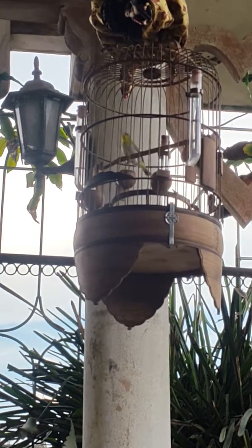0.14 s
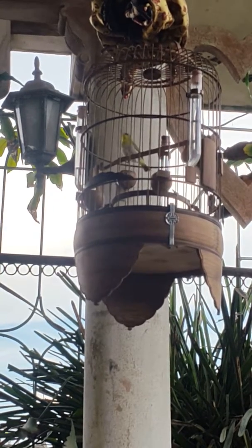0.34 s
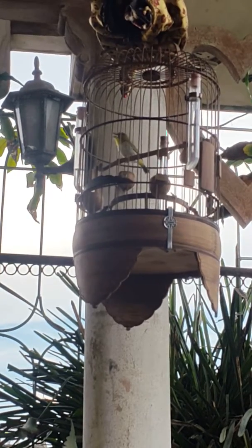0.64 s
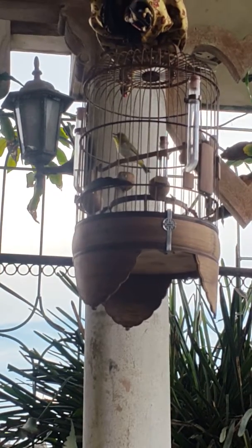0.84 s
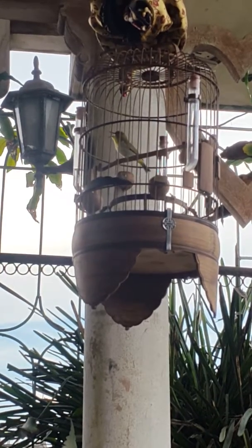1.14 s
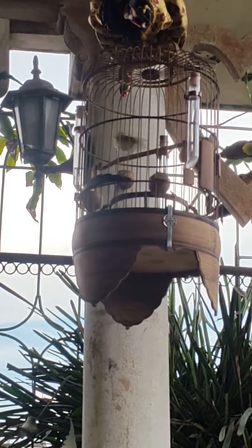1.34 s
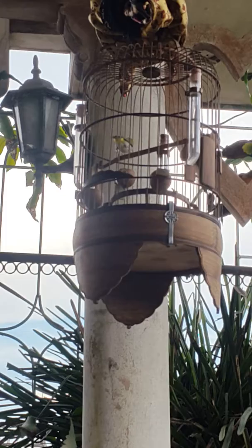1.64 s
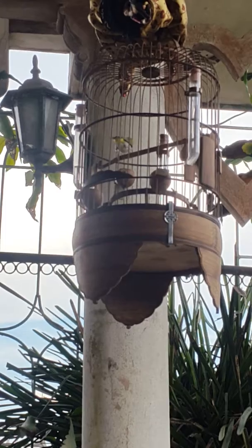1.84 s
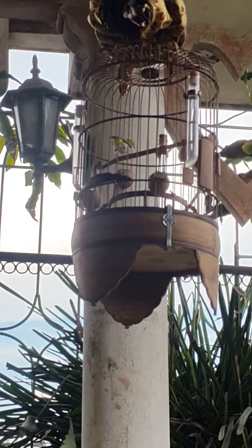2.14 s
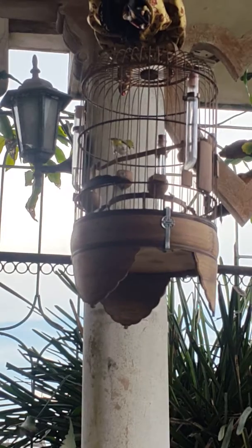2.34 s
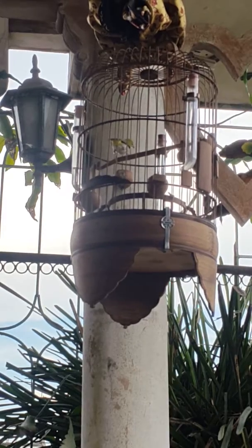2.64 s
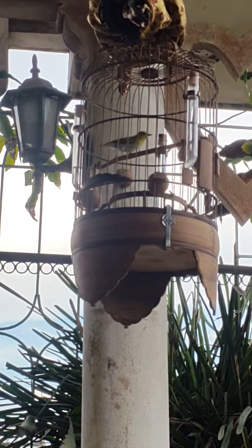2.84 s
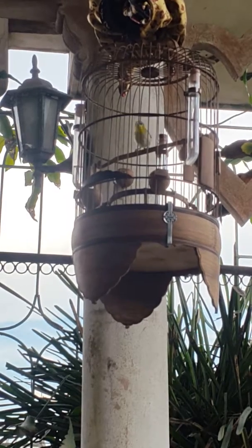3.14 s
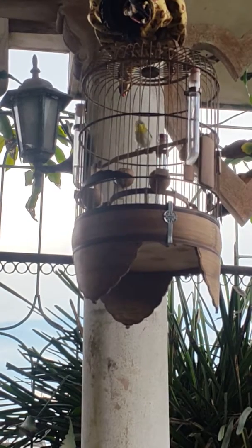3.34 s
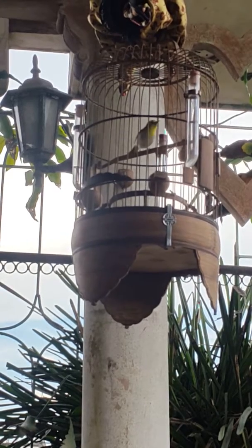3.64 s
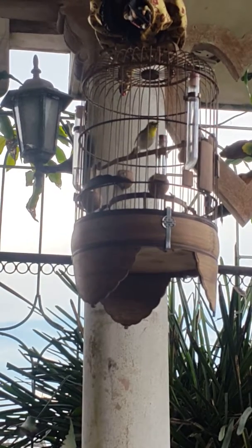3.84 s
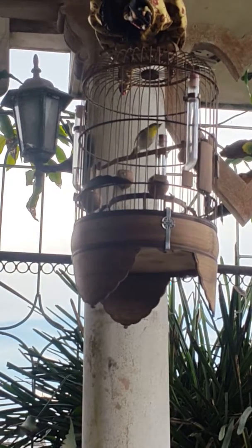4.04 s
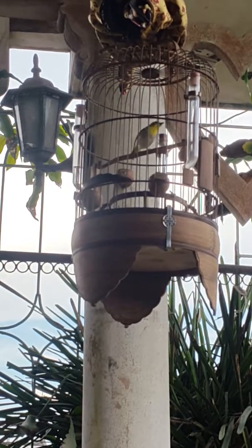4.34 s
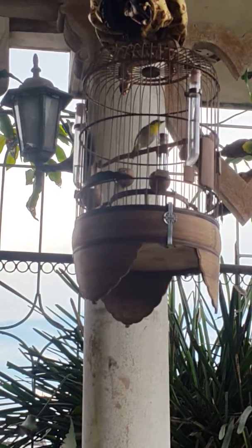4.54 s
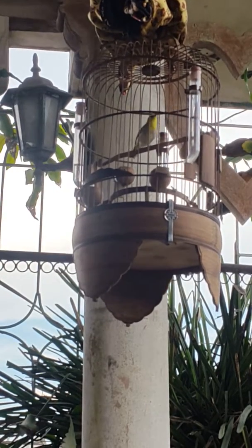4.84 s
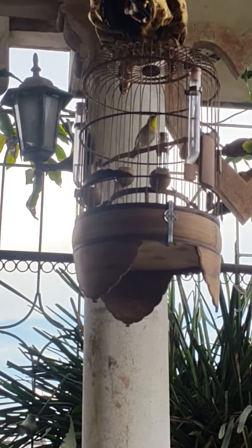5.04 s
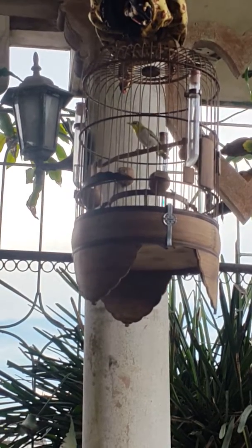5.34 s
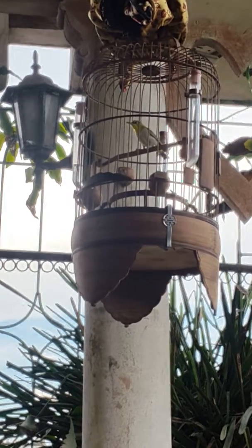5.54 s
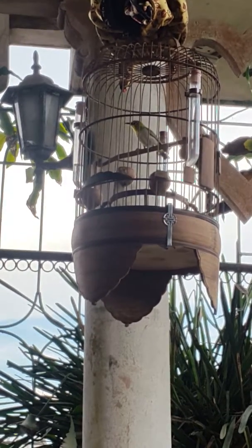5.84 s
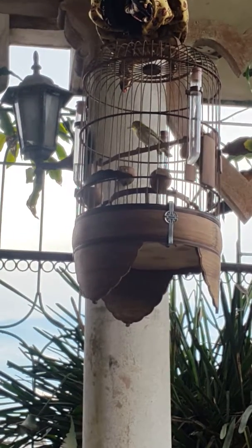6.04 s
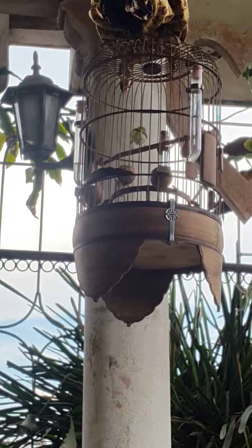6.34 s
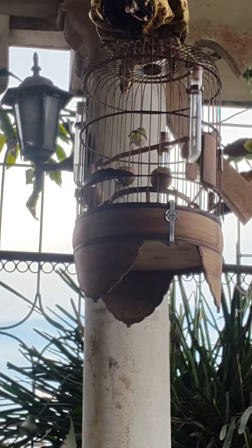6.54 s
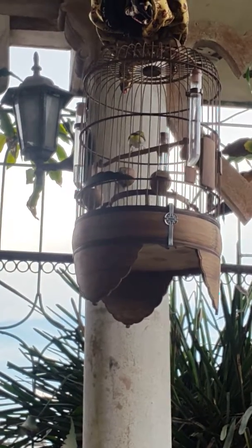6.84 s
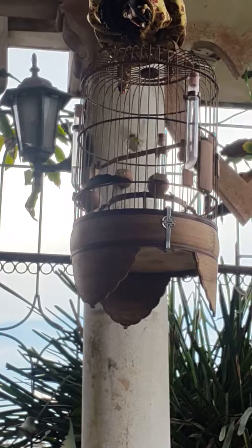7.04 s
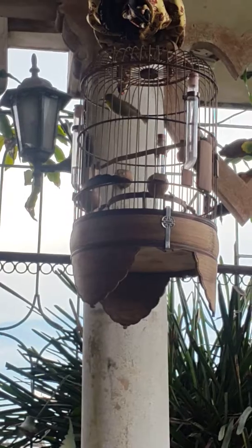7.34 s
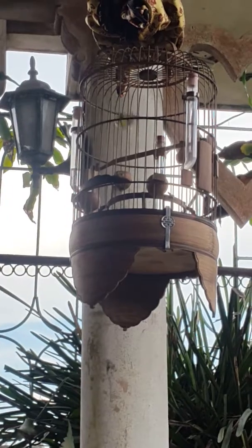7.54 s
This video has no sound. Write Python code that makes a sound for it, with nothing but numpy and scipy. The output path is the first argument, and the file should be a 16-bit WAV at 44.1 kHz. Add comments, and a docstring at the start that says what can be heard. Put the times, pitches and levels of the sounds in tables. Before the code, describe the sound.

A small caged songbird whistles three fast, bright, down-sliding twitter phrases on a roofed balcony, with faint town rumble and very distant calls behind.

```python
"""A town rumbles and hisses, far birds call, then a caged white-eye twitters three fast phrases on a roofed balcony.
Each of its notes is one nearly pure whistle that flicks up and slides down; echoes smear it into a bright tail.
Far calls are gliding sines and far metal is knocked modes, both heard through a diffuse tail.
The town is shaped noise plus an engine hum; a faint high whine is one wavering sine."""
import sys
import numpy as np
from scipy import signal
from scipy.fft import rfft, irfft
from scipy.io import wavfile

SR = 44100
rng = np.random.default_rng(int(sys.argv[2]) if len(sys.argv) > 2 else 0)


def wav_out(sig):
    """Save sig, one row per channel (or a flat mono array), as 16-bit PCM at SR to the path in sys.argv[1]."""
    wavfile.write(sys.argv[1], SR, np.round(np.clip(np.atleast_2d(sig).T, -1, 1) * 32767).astype(np.int16))


N = 339562
TIME = np.arange(N) / SR

# microphone colour towards the cage: f/Hz, left level/dB, right level/dB
MIC_COLOUR = [(3000, -1, 2.5), (4840, -8, 3.5), (5680, -3.5, 6.5), (6480, -6.5, 3.5), (7600, -2, 7.5),
              (9040, 7.5, -5), (10400, -0.5, -15.5), (11040, -7.5, -14), (13200, -0.5, -10.5),
              (14200, 1.5, 0), (15400, -1, 1)]


def white_eye():
    """The bird turns its head as it sings, so each note meets the walls differently."""
    out = np.zeros((2, N + 2 * SR))
    for note, direct_db, overtones_db in song():
        at = round(note[:, 0].min() * SR)
        path = balcony(direct_db)
        for sound in (whistle(in_register(note), overtones_db), flick_puff()):
            heard = signal.fftconvolve(sound[None], path, axes=1)
            out[:, at:at + heard.shape[1]] += heard
    colour = from_db([at_bins(MIC_COLOUR, column=1), at_bins(MIC_COLOUR, column=2)])
    return irfft(rfft(out[:, :N]) * colour, N)


# notes that flick up and slide down; bend 0: straight, > 0: steep first, < 0: steep last
# top t/s, fall t/s, top f/Hz, end f/Hz, bend, level/dB before register, swell over fall/dB,
# straight path/dB, overtones/dB
SLIDE_NOTES = [(0.719, .058, 6850, 4510, -0.2, -29, 7.5, -1.5, -2),
               (.861, 0.064, 6170, 4120, 2, -19.5, -5.5, -6, 7.5),
               (1.016, 0.056, 7090, 4500, -0.3, -16.5, -7, -4, 4),
               (1.142, .026, 7390, 5664, 0.5, -18, -1.5, -1, 3.5),
               (1.406, .101, 7050, 4528, 5, -21, -6, -0.5, 8),
               (1.570, .072, 7040, 5690, -0.9, -18.5, -2.5, 2.5, 2),
               (1.666, .026, 5550, 5230, -2, -20.5, -3, 1.5, 8.5),
               (3.733, .014, 7390, 5870, 1.3, -32.5, 2, -1.5, 1.5),
               (3.973, .138, 7180, 4320, 1.24, -21, -3, 0, 5.5),
               (4.165, .057, 6470, 4453, 1.7, -19, -2, -2, -1),
               (4.313, .113, 6500, 4265, 2.5, -17.5, -4, -3.5, 1),
               (4.501, 0.067, 7180, 5710, -2.5, -19.5, 1, 0.5, 2.5),
               (4.590, .034, 5430, 5380, 0.5, -24, 8, 0, 2),
               (6.384, .016, 7275, 5570, 2.4, -23.5, -7, -4.5, 3),
               (6.734, .026, 7080, 5090, -3, -20.5, 2, -2, -1.5),
               (6.972, .015, 7310, 5490, -0.3, -19, -3.5, -1, -3),
               (7.259, .034, 6940, 5295, 3.5, -26, 6, -2.5, -2),
               (7.456, 0.02, 7080, 5547, 2, -20.5, -3.5, 0, 3),
               (7.688, 0.014, 6306, 5040, 4, -25.5, 4.5, -5, 12)]
# new crests within a slide: crest t/s, fall t/s, crest f/Hz, end f/Hz, bend,
# level/dB before register, swell over fall/dB
REBOUND_CRESTS = [(.808, 0.014, 4755, 4490, 0, -25.5, -7), (.955, .012, 4262, 4235, 2.5, -22.5, -2),
                  (1.202, .114, 5667, 4370, 2, -20, -7), (3.772, .058, 6890, 5618, 2, -27.5, 5),
                  (3.864, .036, 5580, 4850, 1, -21.5, -5.5), (4.252, .016, 4857, 4720, -.5, -19.5, -5.5),
                  (6.428, 0.066, 6760, 4790, 0.1, -22, -6), (6.526, .075, 5646, 4510, 2, -21, -8.5),
                  (6.774, .100, 5645, 4320, 2.06, -21.5, -1), (7.010, .026, 6150, 4683, 2.5, -18.5, -4.5),
                  (7.064, .099, 5766, 4367, 1.3, -20.5, -2), (7.322, .058, 5133, 4440, .5, -24.5, 0),
                  (7.508, .036, 5600, 4590, -0.9, -21, -6), (7.559, 0.032, 5463, 4710, -5.5, -17.5, -7.5)]
# phrase endings: climb t/s, dive t/s, level/dB before register, straight path/dB, overtones/dB
PHRASE_ENDINGS = [(1.755, 1.960, -21, 0.5, 2), (4.697, 4.905, -20, -1, 0)]


def song():
    """Slides with their rebounds, then phrase endings: (note, straight path dB, overtones dB)."""
    notes = []
    next_tops_s = [row[0] for row in SLIDE_NOTES[1:]] + [np.inf]
    for (*first_fall, direct_db, overtones_db), until_s in zip(SLIDE_NOTES, next_tops_s):
        rebounds = [row for row in REBOUND_CRESTS if first_fall[0] < row[0] < until_s]
        notes.append((slide([first_fall] + rebounds), direct_db, overtones_db))
    for climb_s, dive_s, db, direct_db, overtones_db in PHRASE_ENDINGS:
        notes.append((climb(climb_s, db), direct_db, overtones_db))
        notes.append((dive(dive_s, db), direct_db, overtones_db))
    return notes


# opening flick: lead time, share of top pitch, level step
FLICK_S, FLICK_FROM, FLICK_DB = 0.0058, 0.83, -13
# closing drop: length, share of end pitch, level step
DROP_S, DROP_TO, DROP_DB = 0.012, 0.89, -6.5


def slide(falls):
    """An opening flick, one or more falls joined without a break, a closing drop: rows (s, Hz, dB)."""
    body = np.vstack([fall(*row) for row in falls])
    start_s, top_hz, top_db = body[0]
    end_s, end_hz, end_db = body[-1]
    opening = (start_s - FLICK_S, top_hz * FLICK_FROM, top_db + FLICK_DB)
    closing = (end_s + DROP_S, end_hz * DROP_TO, end_db + DROP_DB)
    return np.vstack([opening, body, closing])


def fall(start_s, length_s, top_hz, end_hz, bend, db, swell_db, count=40, knee_hz=6224, overshoot_s=0.0084):
    """Pitch relaxes from crest to end; the part above the knee dies exponentially: rows (s, Hz, dB)."""
    along = np.linspace(0, 1, count)
    sunk = np.cumsum(np.exp(-bend * along))
    sunk = (sunk - sunk[0]) / (sunk[-1] - sunk[0])
    start_hz = min(top_hz, knee_hz)
    overshoot_hz = (top_hz - start_hz) * np.exp(-along * length_s / overshoot_s)
    hz = start_hz + (end_hz - start_hz) * sunk + overshoot_hz
    return np.column_stack([start_s + along * length_s, hz, db + swell_db * along])


# climb pitch before the trill: t/s into the note, f/Hz
CLIMB_PITCH = [(0, 3660), (.009, 4210), (.027, 4190), (.049, 3940), (.058, 4556), (.095, 5067), (.13, 5860),
               (.146, 5580), (0.189, 5600)]
TRILL_START_S, TRILL_S, TRILL_HZ = 0.054, 0.066, 54.84
TRILL_DEPTH, TRILL_DB = 0.05, 2.5  # swing in pitch (share) and level
CLIMB_FADE_DB_PER_S = 127.5  # from the end of the trill


def climb(start_s, db, count=190):
    """A low held note that trills upwards, then holds and fades: rows (s, Hz, dB)."""
    s, hz = np.transpose(CLIMB_PITCH)
    t = np.linspace(0, s[-1], count)
    since = t - TRILL_START_S
    trill = np.sin(2 * np.pi * TRILL_HZ * since) * (since > 0) * (since < TRILL_S)
    onset_db = FLICK_DB * np.maximum(1 - t / FLICK_S, 0)
    fade_db = CLIMB_FADE_DB_PER_S * np.maximum(since - TRILL_S, 0)
    pitch = np.interp(t, s, hz) * (1 + TRILL_DEPTH * trill)
    return np.column_stack([start_s + t, pitch, db + TRILL_DB * trill + onset_db - fade_db])


# dive pitch: t/s into the note, f/Hz
DIVE_PITCH = [(0, 5910), (.006, 6350), (.022, 5838), (.033, 4540), (.049, 4100), (.064, 3567)]


def dive(start_s, db):
    """The steep last note of a phrase ending, with a soft start: rows (s, Hz, dB)."""
    return np.array([(start_s + s, hz, db + FLICK_DB * (k == 0)) for k, (s, hz) in enumerate(DIVE_PITCH)])


# throat response, best in the middle register: pitch f/Hz, level/dB
THROAT_REGISTER = [(3600, -13.5), (4000, -8.5), (4350, -8.5), (4600, -2), (5000, -2), (5700, -1),
                   (6300, -0.54), (7200, -2)]


def in_register(note):
    """The throat makes the level of a note follow its pitch."""
    s, hz, db = note.T
    return np.column_stack([s, hz, db + np.interp(hz, *np.transpose(THROAT_REGISTER))])


# whistle partials: multiple of half the pitch, level/dB before the overtone offset (multiples > 2)
WHISTLE_PARTIALS = [(1, -52.5), (2, 0.5), (3, -31.5), (4, -27.5), (6, -27.5)]


def whistle(note, overtones_db, flutter=0.0044, shimmer_db=0.55, warble=0.035, warble_hz=100,
            warble_s=0.027, rest_hz=4300, breath_db=-50, fade_s=0.0011):
    """One syrinx note; slightly unequal cycles add faint lines half way between the harmonics."""
    s, hz, db = np.transpose(note)
    s = np.sort(s)
    t = np.arange(s[0], s[-1], 1 / SR)
    knots_s = s[0] + np.arange(200) * 0.002
    tremble, shimmer = (np.interp(t, knots_s, row) for row in rng.standard_normal((2, 200)))
    # pitch rings on after the flick: the higher the flick, the wider
    since = np.maximum(t - s[1], 0)
    depth = 2 * warble * max(hz[1] / rest_hz - 1, 0)
    ring_hz = warble_hz * (1 + 0.071 * rng.normal())
    swing = depth * np.exp(-since / warble_s) * np.sin(2 * np.pi * ring_hz * since)
    pitch = np.interp(t, s, hz) * (1 - swing + flutter * tremble)
    half_phase = np.pi * np.cumsum(pitch) / SR
    wave = np.zeros(len(t))
    for multiple, level_db in WHISTLE_PARTIALS:
        k = round(multiple)
        gain = from_db(level_db + overtones_db * (k > 2))
        wave += gain * np.sin(k * half_phase) * (k * pitch < SR)  # mute above Nyquist
    # a little air rushes past the membrane
    wave += from_db(breath_db) * rng.standard_normal(len(t))
    edge_s = np.minimum(t - s[0], s[-1] - t)
    gate = np.sin(np.pi / 2 * np.clip(edge_s / fade_s, 0, 1)) ** 2
    return wave * gate * from_db(np.interp(t, s, db) + shimmer_db * shimmer)


def flick_puff(puff_db=-51, peak_s=0.0067, low_hz=6000):
    """The tiny puff with which each note opens: high-passed noise that swells and dies."""
    t = TIME[:SR // 20]
    high_pass = signal.butter(1, low_hz, "high", fs=SR, output="sos")
    puff = signal.sosfilt(high_pass, rng.standard_normal(len(t)))
    return from_db(puff_db) * puff * (t / peak_s) * np.exp(1 - t / peak_s)


# first reflections off pillar, roof and walls: nominal delay t/s, level/dB re straight-path scale
FIRST_ECHOES = [(.0032, -11.5), (.0075, -7), (0.0105, -10.5), (0.017, -13.5), (.0235, -13)]


def balcony(direct_db, early_db=-1.0, late_db=-8.5, air_hz=7500, beam_hz=6600, shift_s=0.00067):
    """Response for one pose: straight path, hard echoes, a quick wash under the roof, a longer tail."""
    early = tail(t60=0.34, build_s=0.0025, alike=0.28)
    # air takes the top off the long paths
    air = signal.butter(4, air_hz, fs=SR, output="sos")
    late = signal.sosfilt(air, tail(t60=0.65, build_s=0.044, alike=0.2))
    hard = np.zeros((2, SR))
    echoes = [(abs(delay_s + shift_s * rng.normal()), db) for delay_s, db in FIRST_ECHOES]
    for delay_s, db in [(0.00076, direct_db)] + echoes:
        at = round(delay_s * SR)
        hard[[0, 1], [at + 2, at]] += from_db(db)  # right side is reached first
    # the beak beams its highest tones past the microphones: they come mostly by the wash
    hard = signal.sosfilt(signal.butter(1, beam_hz, fs=SR, output="sos"), hard)
    return np.sqrt(2) * hard + from_db(early_db) * early + from_db(late_db) * late


# distant calls: t/s, length t/s, start f/Hz, end f/Hz, level/dB before the tail, hoarseness 0-1
DISTANT_CALLS = [(0.401, 0.04, 7440, 5080, -54, 0.57), (0.471, 0.11, 5110, 4560, -57, .4),
                 (0.529, 0.27, 1665, 1798, -54, 0.76), (2.42, 0.15, 1870, 1810, -53.5, 0.7),
                 (2.58, 0.17, 1874, 2003, -57.5, 0.6), (2.402, 0.16, 6060, 5640, -62, 1),
                 (3.38, 0.18, 4820, 4200, -64.5, 0.52), (5.486, 0.17, 1890, 1825, -59.5, 0.04),
                 (5.49, 0.16, 1151, 1135, -54.5, 0.16), (5.531, 0.2, 4920, 4080, -65, 0.54),
                 (5.629, 0.23, 1622, 1778, -56.5, 0.33), (5.68, 0.205, 834, 856, -55, 0.61),
                 (5.972, 0.16, 5700, 4590, -69.5, .4), (6.123, 0.2, 644, 612, -50, 0.39)]


def far_calls(waver=0.12):
    """Gliding sines under round envelopes; hoarse ones scatter in pitch."""
    out = np.zeros(N)
    wobble = waver * drift(120)
    for start_s, length_s, start_hz, end_hz, db, hoarse in DISTANT_CALLS:
        on = (TIME > start_s) & (TIME < start_s + length_s)
        along = (TIME[on] - start_s) / length_s
        pitch = (start_hz + (end_hz - start_hz) * along) * (1 + hoarse * wobble[on])
        envelope = 2 * np.sqrt(along * (1 - along))
        out[on] += from_db(db) * envelope * np.sin(2 * np.pi * np.cumsum(pitch) / SR)
    return out


# far metallic knocks: t/s, level/dB before the tail
METAL_KNOCKS = [(1.24, -68.5), (1.66, -60.5), (2.079, -55.5), (2.48, -64)]
# modes of the metal: f/Hz, level/dB re knock, t60/s
METAL_MODES = [(1306, 6.5, .6), (1674, -2.5, .5), (2180, 9, 0.37), (2600, -25, .7), (2770, -6, .8),
               (5152, -15.5, .5), (5825, -11, .5), (6535, -15.5, .5)]


def far_metal(clatter_db=8.5, clatter_t60=0.31):
    """Each knock rings the metal's decaying modes over a short noise rattle."""
    out = np.zeros(N)
    t = TIME[:SR]
    band = signal.butter(2, [1200, 3000], "band", fs=SR, output="sos")
    rattle = rms_one(signal.sosfilt(band, rng.standard_normal(N)))
    rings = sum(from_db(level_db - 60 * t / t60) * np.sin(2 * np.pi * hz * t)
                for hz, level_db, t60 in METAL_MODES)
    for knock_s, db in METAL_KNOCKS:
        at = round(knock_s * SR)
        clatter = rattle[at:at + SR] * from_db(clatter_db - 60 * t / clatter_t60)
        out[at:at + SR] += from_db(db) * (rings + clatter)
    return out


# spectral shapes, normalised to rms 1 when played: f/Hz, relative density/dB
RUMBLE_SPECTRUM = [(12, -51), (20, -23), (32, -21.5), (50, -12), (62, -4.5), (80, -4), (113, 0.5),
                   (138, -1.5), (215, -12), (345, -9.5), (471, -19.5), (849, -26), (1000, -32), (1300, -62),
                   (2200, -120)]
HISS_SPECTRUM = [(470, -30), (800, -13), (942, -12.5), (1080, -10.5), (1190, -11), (1420, -12), (2320, -21),
                 (2870, -20), (4240, -29.5), (4630, -22.5), (6170, -31.5), (6490, -27), (10700, -49.5),
                 (12100, -40), (16000, -36.5)]
# level curves, hiss before its offset: t/s, level/dB
RUMBLE_LEVEL = [(0.0, -40.5), (0.28, -39.5), (0.3, -45), (0.38, -38.5), (1.61, -41.5), (1.91, -39.5),
                (3.62, -42), (3.86, -38.5), (4.07, -41.5), (5.21, -42), (5.6, -45.5), (6.11, -41),
                (6.35, -44), (7.7, -43.5)]
HISS_LEVEL = [(0, -57), (.4, -61), (1.2, -58), (2.1, -59), (2.55, -55), (2.9, -61.5), (3.6, -62.5),
              (5.5, -62.5), (5.9, -61), (6.3, -63), (7.7, -65.5)]


def town(hiss_offset_db=2.5, hum_hz=106.7, hum_re_rumble_db=-7.5, hum_waver=0.02):
    """Traffic rumble with an engine hum wavering in pitch and level, and thin hiss above it."""
    rumble_db = in_time(RUMBLE_LEVEL)
    hum_gain = from_db(rumble_db + hum_re_rumble_db + 2.5 * drift(2.2))
    hum_pitch = hum_hz * (1 + hum_waver * drift(3))
    hum = hum_gain * np.sin(2 * np.pi * np.cumsum(hum_pitch) / SR)
    rumble = from_db(rumble_db) * air_noise(RUMBLE_SPECTRUM)
    hiss = from_db(in_time(HISS_LEVEL) + hiss_offset_db) * air_noise(HISS_SPECTRUM)
    return hum + rumble + hiss


# left-right likeness: f/Hz, correlation
TOWN_LIKENESS = [(60, 0.97), (130, 0.95), (290, 0.95), (640, 0.56), (1410, -0.23), (3100, -0.21),
                 (6820, -0.43), (15000, 0.02)]
# side balance: f/Hz, left minus right level/dB
TOWN_BALANCE = [(60, -1), (150, -0.5), (380, -0.5), (950, -2.0), (2380, -3.5), (5980, -14), (15000, 5)]


def air_noise(spectrum):
    """Stereo noise, alike in the bass and slightly opposed in most of the treble; rms 1."""
    mid, side = rfft(rng.standard_normal((2, N)))
    alike = np.clip(at_bins(TOWN_LIKENESS), -0.9, 0.995)
    sides = np.array([[1], [-1]])
    gain = from_db(at_bins(spectrum) + sides * at_bins(TOWN_BALANCE) / 2)
    stereo = np.sqrt(1 + alike) * mid + np.sqrt(1 - alike) * side * sides
    return rms_one(irfft(gain * stereo, N))


def whine(whine_hz=12480, whine_db=-82):
    """A faint high sine that wavers slightly in pitch."""
    pitch = whine_hz * (1 + 0.002 * drift(20))
    return from_db(whine_db) * np.sin(2 * np.pi * np.cumsum(pitch) / SR)


def tail(t60, build_s, alike):
    """One second of diffuse reflections that build up and die away; mean energy 1 a side."""
    t = TIME[:SR]
    envelope = from_db(-60 * t / t60) * (1 - np.exp(-(t / build_s) ** 2))
    return rms_one(noise_pair(alike, SR) * envelope) / np.sqrt(SR)


def noise_pair(alike, size):
    """Two white noises of a given correlation, mixed from mid and side."""
    mid, side = rng.standard_normal((2, size))
    alike = np.clip(alike, 0, 1)
    return np.sqrt((1 + alike) / 2) * mid + np.sqrt((1 - alike) / 2) * side * [[1], [-1]]


def through(x, response):
    """Convolve a mono sound with a stereo path."""
    return signal.fftconvolve(x[None], response, axes=1)[:, :N]


def drift(rate_hz):
    """Smooth random curve, about rate_hz turns a second; rms 1."""
    r = np.exp(-2 * np.pi * rate_hz / SR)
    noise = rng.standard_normal(N + SR)
    return rms_one(signal.lfilter([1], [1, -2 * r, r * r], noise)[SR:])  # skip the settling


def from_db(db):
    """Decibels to gain."""
    return 10 ** (np.asarray(db) / 20)


def rms_one(x):
    """Scale to rms 1."""
    return x / np.sqrt(np.mean(x ** 2) + 1e-20)


def in_time(rows):
    """A curve of (s, value) rows at every sample."""
    return np.interp(TIME, *np.transpose(rows))


def at_bins(points, column=1):
    """A table over log frequency, read at every bin of the spectrum."""
    points = np.array(points)
    bins_hz = np.arange(N // 2 + 1) * SR / N
    return np.interp(np.log(bins_hz + 1), np.log(points[:, 0]), points[:, column])


def scene():
    """The bird close by; calls and metal far off through a tail; town and whine behind."""
    distance = through(far_calls() + far_metal(), tail(t60=0.9, build_s=0.0032, alike=0.42))
    return white_eye() + distance + town() + whine()


def record(dry, cutoff_hz=15850):
    """A steep elliptic low-pass cuts the top."""
    return signal.sosfilt(signal.ellip(12, 0.1, 90, cutoff_hz, fs=SR, output="sos"), dry)


dry = scene()
out = record(dry)
wav_out(out)
```